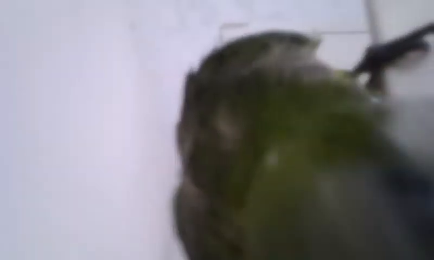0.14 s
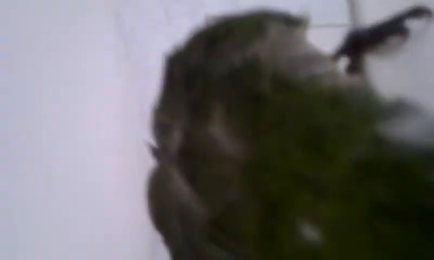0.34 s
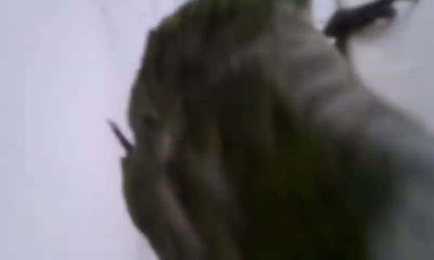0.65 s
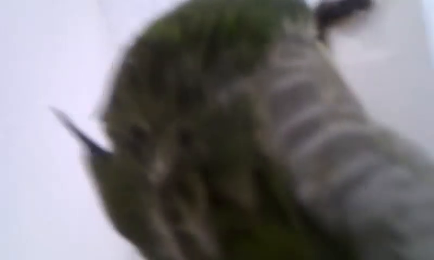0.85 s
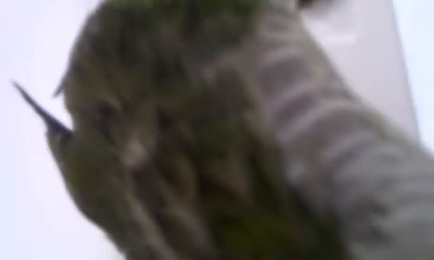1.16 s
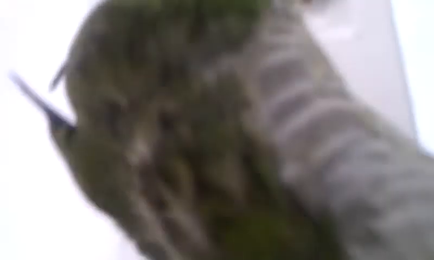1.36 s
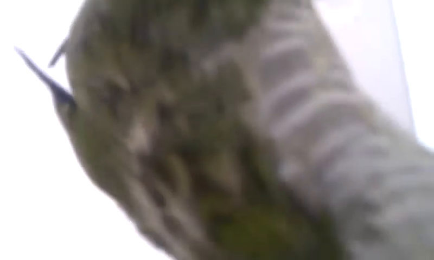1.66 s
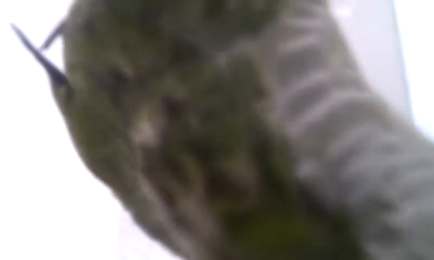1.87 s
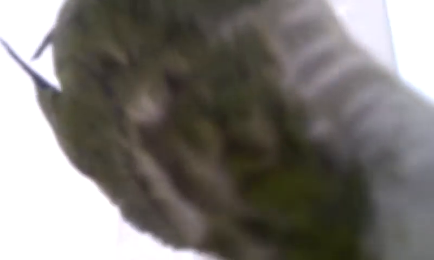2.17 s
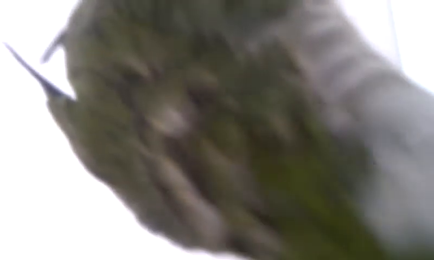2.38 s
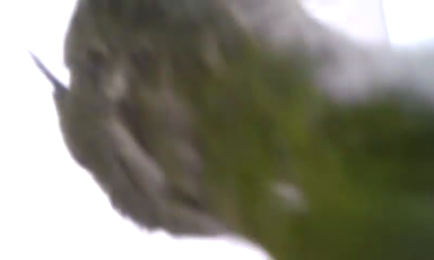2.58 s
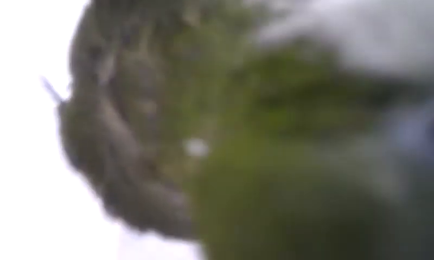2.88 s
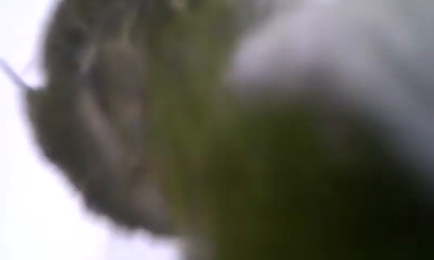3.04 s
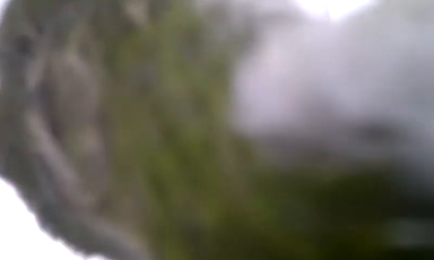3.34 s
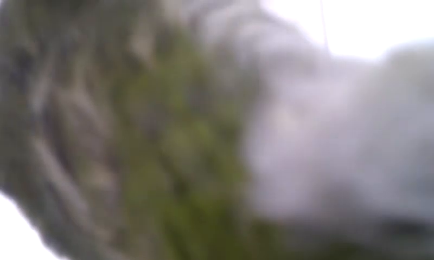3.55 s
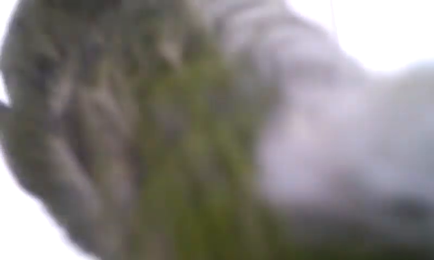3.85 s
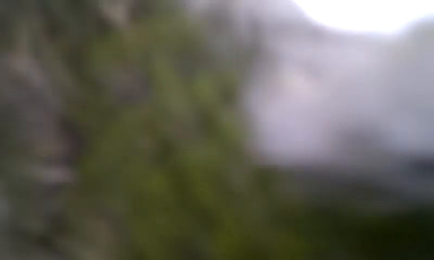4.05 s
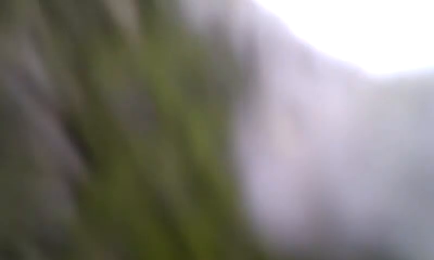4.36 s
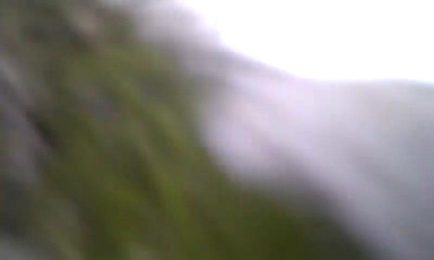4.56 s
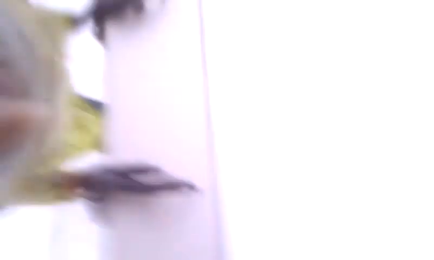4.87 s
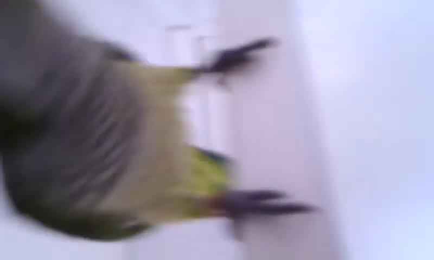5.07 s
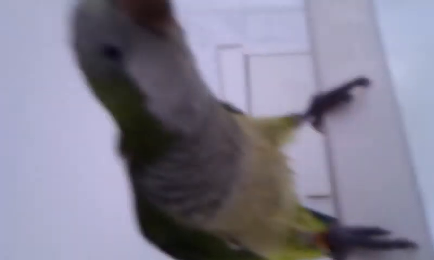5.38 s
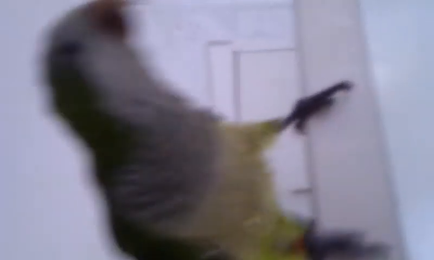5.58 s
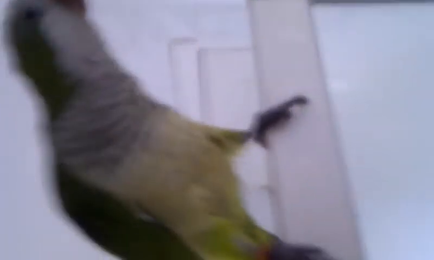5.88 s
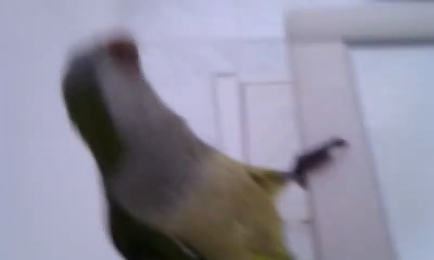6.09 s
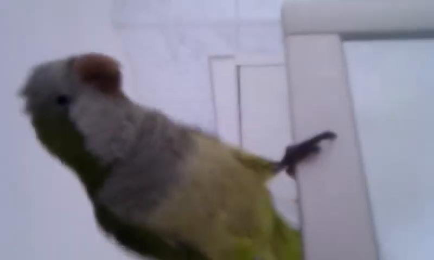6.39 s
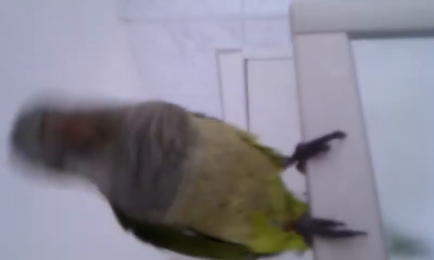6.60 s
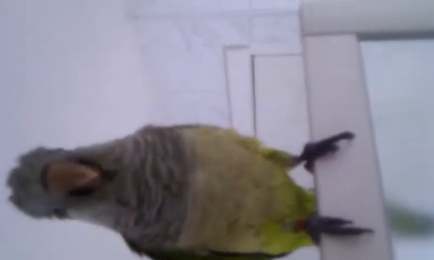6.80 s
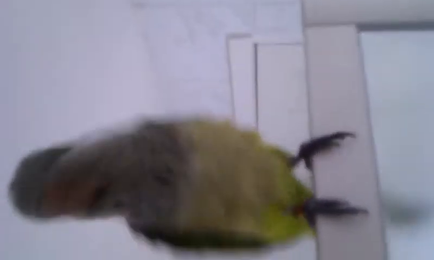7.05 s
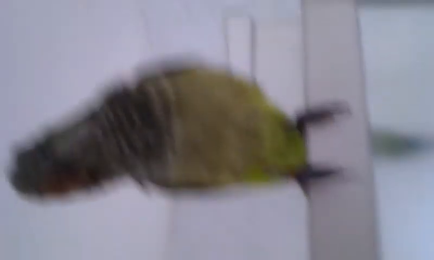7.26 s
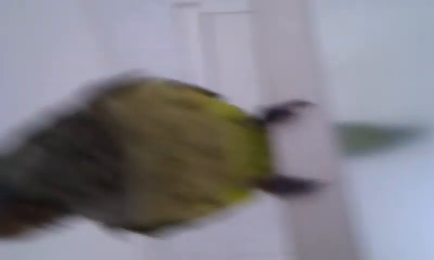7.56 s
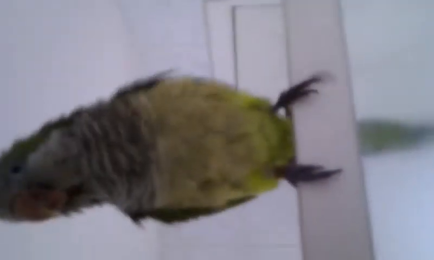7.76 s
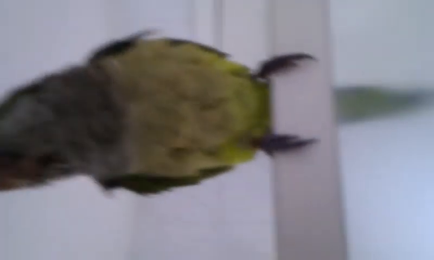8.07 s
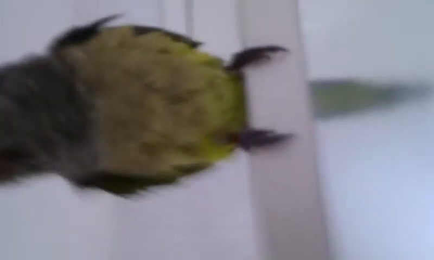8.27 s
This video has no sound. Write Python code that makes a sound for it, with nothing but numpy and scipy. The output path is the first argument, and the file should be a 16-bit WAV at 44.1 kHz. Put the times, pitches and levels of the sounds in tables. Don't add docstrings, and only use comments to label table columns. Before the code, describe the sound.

A shower is already running in a small tiled bathroom and continues throughout, heard in mono through a narrow, dull phone microphone. Low, fuzzy drumming on the tub lies under rustling wall water and a dense, grainy hiss. Light splats gather around 0.6-0.8 s, then a heavy slap at 0.9 s spatters and rebounds. More hits fall at 1.9, 3.3 and 3.6 s, with sparser splashes between; a bright plop comes near 2.7 s. A hard crack of water at 4.0 s makes the level dip. From 4.8 s splashes grow frequent, peaking with the loudest at 5.9 s and crowding through 7 s. A bubbly plop cluster sounds near 7.15 s, then a splat with rebounds at 7.5 s ducks everything. The stream weakens slightly, with last slaps at 8.15 and 8.4 s. Loudest hits carry tiny crackling ticks and short tiled echoes.

```python
import sys
import numpy as np
from scipy import signal
from scipy.fft import rfft, irfft, next_fast_len
from scipy.io import wavfile
from scipy.ndimage import uniform_filter1d

SR = 44100
rng = np.random.default_rng(int(sys.argv[2]) if len(sys.argv) > 2 else 0)


def voltage_ratio(decibels):
    exponent = np.asarray(decibels, float) / 20
    return 10 ** exponent


def dump(signal):
    limited = np.clip(np.atleast_2d(signal).T, -1, 1)
    pcm = np.round(limited * 32767).astype(np.int16)
    wavfile.write(sys.argv[1], SR, pcm)


N = 371762


def evened(x):
    return x / np.sqrt(np.mean(x ** 2) + 1e-20)


def read_curve(points, hz):
    f, value = np.transpose(points)
    return np.interp(np.log(hz + 1), np.log(f + 1), value)


def add(mix, s, sound):
    part = mix[round(s * SR):][:len(sound)]
    part += sound[:len(part)]


def resonate(x, hz, width_hz):
    turn = np.exp(2j * np.pi * hz * np.arange(len(x)) / SR)
    r = np.exp(-np.pi * width_hz / SR)
    return 2 * (turn * signal.lfilter([1 - r], [1, -r], x / turn)).real


def coloured(x, points):
    hz = abs(np.fft.fftfreq(8192, 1 / SR))
    log_gain = np.log(voltage_ratio(read_curve(points, hz)))
    taps = np.fft.ifft(np.exp(signal.hilbert(log_gain).conj())).real[:2048]
    return signal.oaconvolve(x, taps)[:len(x)]


def wash(points, patchy_db, flicker_db, size):
    frames, hz = 4 * N // size + 5, np.fft.rfftfreq(size, 1 / SR)
    a, b, patches = rng.standard_normal((frames, len(hz), 3)).T
    patches = uniform_filter1d(patches, size=size // 100, axis=0)
    patches = evened(uniform_filter1d(patches, size=6000 // size, axis=1))
    flicker = evened(uniform_filter1d(rng.standard_normal(frames), size=3))
    db = read_curve(points, hz)[:, None] + patchy_db * np.clip(patches, -2, 2) + flicker_db * flicker
    noise = signal.istft((a + 1j * b) * voltage_ratio(db), nperseg=size, noverlap=3 * size // 4)[1]
    return evened(noise[:N])


# frequency in Hz, decay time t60 in seconds.
ROOM_DECAY = [(200, .35), (1000, 0.41), (2700, 0.26), (4500, 0.63)]


def room(x):
    taps = np.zeros(SR // 2)
    at = np.arange(150, len(taps) - 20, 20)
    taps[at + rng.integers(0, 20, len(at))] = rng.choice([-1., 1.], len(at))
    hz, t, z = signal.stft(taps, SR, nperseg=256)
    dying = voltage_ratio(-60 * t / read_curve(ROOM_DECAY, hz)[:, None])
    tail = signal.istft(z * dying, SR, nperseg=256)[1]
    return signal.oaconvolve(x, tail / np.linalg.norm(tail))[:N]


# time in seconds, strength in dB, aim from 0 (tub floor) to 1 (tiles).
STREAM_COURSE = [(0, -24.5, .5), (.5, -26, .5), (.95, -26.5, 0.42), (1.2, -26, .55), (1.5, -26, 0.33),
                 (1.9, -25.5, 0.61), (2.55, -26, .45), (2.9, -25, 0.53), (3.3, -26, 0.51),
                 (3.75, -26.5, 0.49), (4.5, -26.5, 0.46), (5.1, -26, .5), (5.7, -24.5, 0.41),
                 (6.2, -26, 0.61), (6.8, -25.5, 0.34), (7.4, -27.5, 0.43), (7.95, -28.5, .35),
                 (8.43, -28.5, 0.31)]
# level over the stream in dB, change in dB per unit of aim, random wander in dB,
# share of the ducking (ratio).
LAYER_RESPONSE = [
    (-6.5, -7.5, 1.07, 1.05),
    (-9, 3, 1.1, 1.4),
    (1.2, 8.5, 0.74, .8),
]
# start in seconds, depth in dB, recovery in seconds.
SLOW_DUCKS = [
    (0.001, 4, 0.27),
    (4.002, 4.5, 0.5),
    (5.885, 5, .09),
    (6.756, 4.5, 0.26),
    (7.548, 8, .24),
]


def layer_gain(layer):
    s, stream_db, aim = np.transpose(STREAM_COURSE)
    t = np.arange(0, N + 256, 256) / SR
    over_db, aim_db, wander_db, ducked = LAYER_RESPONSE[layer]
    sway_hz = np.geomspace(2.5, 14, 24)[:, None]
    swings = np.sin(2 * np.pi * (sway_hz * t + rng.random(sway_hz.shape))) / np.sqrt(sway_hz)
    sway = evened(swings.sum(0))
    duck_db = sum(db * (t >= at) * np.exp(-((t - at) / back) ** 2) for at, db, back in SLOW_DUCKS)
    db = np.interp(t, s, stream_db + aim_db * (aim - .5)) + over_db + wander_db * sway - ducked * duck_db
    return voltage_ratio(np.interp(np.arange(N) / SR, t, db))


# frequency in Hz, density in dB per Hz.
TUB_SPECTRUM = [(15, -57), (25, -36.5), (96, -7.5), (156, -9.5), (223, 0), (279, -7.5), (445, -2),
                (509, -6.5), (565, -4), (628, -6.5), (900, -12.5), (1170, -38.5), (1980, -120)]
# frequency in Hz, width in Hz, level in dB rms.
TUB_RESONANCES = [(114.4, 9, -47.5), (231.9, 7, -38.5), (333.5, 43, -41), (569, 7.3, -42.5)]


def tub():
    drive = rng.standard_normal((len(TUB_RESONANCES), N))
    modes = np.zeros(N)
    for x, (hz, width_hz, db) in zip(drive, TUB_RESONANCES):
        modes += voltage_ratio(db + 32) * evened(resonate(x, hz, width_hz))
    return layer_gain(0) * (wash(TUB_SPECTRUM, 2.3, 1.4, size=1024) + modes)


# frequency in Hz, density in dB per Hz.
WALL_SPECTRUM = [(250, -44), (500, -20), (700, 0), (1100, 1), (1600, 3), (2200, -16), (3500, -29)]


def walls():
    return layer_gain(1) * wash(WALL_SPECTRUM, 1.6, 1.0, size=512)


# frequency in Hz, density in dB per Hz.
SPRAY_SPECTRUM = [(1000, -32), (1500, -15), (1900, -3.5), (2300, 1), (2750, 0), (3300, -3.5), (3600, -11),
                  (3850, -18), (4000, -18)]


def spray():
    drops_per_s = 400
    clicks = voltage_ratio(5.9 * np.minimum(rng.exponential(1, N), 4.2)) * (rng.random(N) < drops_per_s / SR)
    clicks *= rng.choice([-1., 1.], N)
    droplets = coloured(clicks + voltage_ratio(0.5) * room(clicks), SPRAY_SPECTRUM)
    hiss = wash(SPRAY_SPECTRUM, 2.2, .4, size=512)
    return layer_gain(2) * (voltage_ratio(-2.5) * hiss + voltage_ratio(-6) * evened(droplets))


# start in seconds, peak in dB, slap over the spatter in dB, ring in Hz,
# decay time t60 of the spatter in seconds.
HEAVY_SPLATS = [(0.9288, -1, 5, 2766, 0.3), (1.1625, -8, 3.5, 2700, 0.095), (1.8795, -3, 4.5, 2894, 0.2),
                (2.0622, -8.5, 8.5, 2770, 0.14), (3.3051, -1.5, -2.5, 2565, 0.27),
                (3.6198, -3, 6, 3426, 0.17), (3.9928, 0, 13.5, 3210, 0.3), (4.806, -8, 4.5, 3200, 0.49),
                (4.932, -4, 5.5, 3230, 0.19), (5.1068, -9.5, 11, 3135, 0.19), (5.4081, -10, 7, 2620, 0.38),
                (5.5913, -5.5, -5, 2705, 0.14), (5.6462, -7.5, 5.5, 2140, 0.087),
                (5.7214, -3.5, 2, 2190, 0.15), (5.876, 2.5, 5, 2610, 0.12),
                (6.0366, -10.5, 8.5, 2923, 0.12), (6.1731, -4, 8.5, 2233, 0.25),
                (6.4874, -1, 0, 2310, 0.12), (6.706, -7.5, 9.5, 2530, 0.31),
                (6.7475, -3.5, 10.5, 2327, 0.12), (6.9663, -6, 12.5, 3034, 0.26),
                (7.5389, -5.5, 9.5, 2710, 0.16), (8.153, -3, 5.5, 2695, 0.31), (8.4111, -6.5, 6, 2338, 0.4)]
# start in seconds, peak
# in dB, ring in Hz.
LIGHT_SPLATS = [(0.3702, -13.5, 3140), (0.645, -9, 3035), (0.6953, -11.5, 2640), (0.7332, -7.5, 2796),
                (1.0354, -9, 2690), (1.4069, -13.5, 2216), (1.6599, -8.5, 2880), (1.8085, -13, 3290),
                (2.3043, -17, 3025), (2.6713, -16, 1866), (2.871, -13.5, 3040), (2.9956, -12, 2720),
                (3.1163, -17.5, 2585), (3.1986, -11.5, 2675), (3.5746, -14.5, 3220), (3.692, -10, 2800),
                (3.912, -13.5, 2380), (4.651, -13, 2434), (4.49, -21.5, 2745), (5.2594, -19.5, 2805),
                (5.502, -9, 3310), (5.9568, -15.5, 3200), (6.147, -8, 2330), (6.2467, -15, 2730),
                (6.3515, -8.5, 2080), (6.5282, -9.5, 2710), (7.5838, -11, 2580), (7.8646, -16.5, 2380),
                (7.9832, -15.5, 2037), (8.117, -12, 2730),
                (.3305, -18, 2650), (0.6238, -16.5, 2630), (0.66, -21, 1393), (0.7714, -14.5, 2695),
                 (.958, -6.5, 2780), (1.04, -13, 1446), (1.155, -17.5, 1304), (1.305, -19, 2214),
                 (1.441, -15.5, 1994), (1.5913, -20, 2720), (2.075, -21, 1358), (2.155, -14.5, 2100),
                 (2.193, -17.5, 2344), (2.77, -21, 1518), (2.881, -23, 1316), (3.31, -21.5, 1400),
                 (3.958, -20.5, 1330), (4.59, -18.5, 1996), (5.135, -10.5, 2866), (5.185, -10, 2514),
                 (5.19, -23.5, 1470), (6.06, -13, 2490), (6.159, -20.5, 1503), (6.6129, -15, 2410),
                 (6.8488, -13.5, 2320), (7.208, -17, 2234), (7.36, -14, 2230), (7.4417, -15, 2500),
                 (8.16, -19, 1724), (8.348, -17.5, 2620)]
# start in seconds, peak in dB, ring in Hz.
SPLAT_REBOUNDS = [(0.9304, -2.5, 2650), (0.937, -2.5, 2700), (.945, -6, 2650), (3.316, -8.5, 2850),
                  (3.999, -3, 2756), (4.85, -11, 2360), (5.425, -11, 2800), (5.7217, -10.5, 2685),
                  (5.882, -7, 3010), (6.0373, -7, 2880), (6.752, -11.5, 2550), (7.542, -3, 2720),
                  (7.546, -10, 2924), (8.159, -6, 2753)]
# frequency in Hz, gain in dB.
MIC_RESPONSE = [(300, -25.5), (1000, -16.5), (1700, -13), (2300, -1.5), (2800, 0), (3300, 0.5), (3600, -3),
                (3850, -20.5), (4000, -21.5)]


def splats():
    out, t = np.zeros(N), np.arange(SR // 3) / SR
    swell = np.minimum(t / .003, 1)
    # start s, peak dB, slap dB, ring Hz, t60 s, share of broad hiss in the spatter
    hits = [(*row, 0.71) for row in HEAVY_SPLATS]
    hits += [(s, db, 3.5, hz, 0.23, 0.15) for s, db, hz in LIGHT_SPLATS]
    hits += [(s, db, 11, hz, 0.082, 0.15) for s, db, hz in SPLAT_REBOUNDS]
    noise = rng.standard_normal((len(hits), len(t)))
    for x, (s, db, slap_db, hz, t60, broad) in zip(noise, hits):
        ring = evened(resonate(resonate(x, hz, 600), hz, 600))
        hiss = evened(coloured(x, MIC_RESPONSE))
        lumps = voltage_ratio(1.3 * evened(uniform_filter1d(x[::-1], size=130)))
        spatter = voltage_ratio(-60 * t / t60) * swell * lumps * (broad * hiss + (1 - broad) * ring)
        slap = np.sin(2 * np.pi * hz * t) * (t / 0.00043) * np.exp(1 - t / 0.00058)
        add(out, s, voltage_ratio(db - 12) * (spatter + voltage_ratio(slap_db) * slap))
    return out + voltage_ratio(-7.5) * room(out)


# start in seconds, peak in dB, bubble pitch in Hz, decay t60 in seconds.
DROP_PLOPS = [
    (2.735, -14.5, 1980, 0.088),
    (3.19, -22.5, 1513, 0.19),
    (5.66, -25.5, 374, 0.48),
    (6.72, -28.5, 389, 0.3),
    (7.148, -17, 807, 0.15),
    (7.149, -20, 1560, 0.19),
    (7.165, -24, 750, 0.12),
    (7.155, -22.5, 935, 0.16),
]


def plops():
    out, t = np.zeros(N), np.arange(SR // 4) / SR
    attack = np.minimum(t / 0.0017, 1)
    noise = rng.standard_normal((len(DROP_PLOPS), len(t)))
    for x, (s, db, hz, t60) in zip(noise, DROP_PLOPS):
        cluster = evened(resonate(resonate(x, hz, 250), hz, 250))
        bubbles = np.sin(2 * np.pi * hz * t) + .5 * cluster
        add(out, s, voltage_ratio(db - 60 * t / t60) * bubbles * attack)
    return 0.73 * out + voltage_ratio(-12.5) * room(out)


def scene():
    return (tub() + walls() + spray() + splats() + plops())[None]


def gain_control(x):
    power_db = 10 * np.log10(abs(uniform_filter1d(x ** 2, size=400, origin=199)) + 1e-12)
    fall = np.arange(N) * 21.0 / SR
    held_db = np.maximum.accumulate(power_db + fall) - fall
    over_db = np.maximum(held_db + 13.5, 0)
    return x / voltage_ratio(0.23 * uniform_filter1d(over_db, size=600, origin=299))


# frequency in Hz, gain in dB.
SMOOTHING = [(20, -8.5), (45, -2), (3300, 0), (3700, -2.5), (4000, -6), (4150, -12.5), (4300, -22),
             (4450, -33), (4530, -40), (4600, -92)]


def voice_channel(x):
    fold_hz = 4000
    size = next_fast_len(N + SR)
    hz = np.fft.rfftfreq(size, 1 / SR)
    narrow = irfft(rfft(x, size) * (hz < fold_hz), size)
    mirrored = narrow * (1 + 2 * np.cos(4 * np.pi * fold_hz * np.arange(size) / SR))
    return irfft(rfft(mirrored) * voltage_ratio(read_curve(SMOOTHING, hz)), size)[:N]


# time in seconds, peak in dB, share (0-1) of an opposite top
CUT_TOPS = [
    (.9318, -25, 0.15),
    (.9427, -44.5, 0),
    (4, -42.5, 0),
    (4.0049, -60, 0.1),
    (5.8767, -16.5, 0.5),
    (6.7488, -33.5, 0),
    (8.4296, -34, 0),
]
# time in seconds, peak in dB.
ROUNDED_TOPS = [(0.9086, -70), (0.9464, -59), (3.6112, -64), (3.9944, -64), (4.0104, -53), (5.8814, -57),
                (6.0367, -64), (6.0415, -51), (6.6997, -68), (6.9644, -64), (6.9708, -56), (6.9824, -65),
                (7.5363, -70), (7.5527, -59)]


def add_overload_ticks(band):
    top = np.array([.4, 1, 1, .4, 0, 0, 0, 0, 0, 0, 0, 0])
    for s, db, opposite in CUT_TOPS:
        add(band, s, voltage_ratio(db + 7.0) * (top - opposite * top[::-1]))
    t = np.arange(-20, 21) / SR
    bump = np.hanning(len(t)) / (1 + (t / 0.0003) ** 2) ** 2
    tick = bump * np.cos(2 * np.pi * 3800 * t)
    for s, db in ROUNDED_TOPS:
        add(band, s, voltage_ratio(db + 14) * tick)


def top_cut(x):
    return signal.sosfilt(signal.butter(12, 16500, fs=SR, output="sos"), x)


def record(dry):
    ducked = gain_control(dry[0])
    band = voice_channel(.68 * np.tanh(ducked / .68))
    add_overload_ticks(band)
    return top_cut(band[None])


dry = scene()
out = record(dry)
dump(out)
```